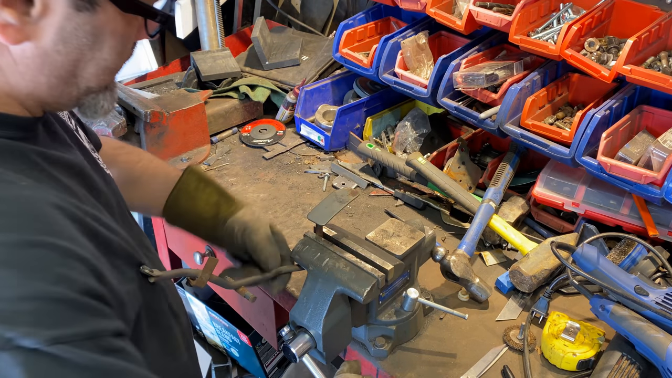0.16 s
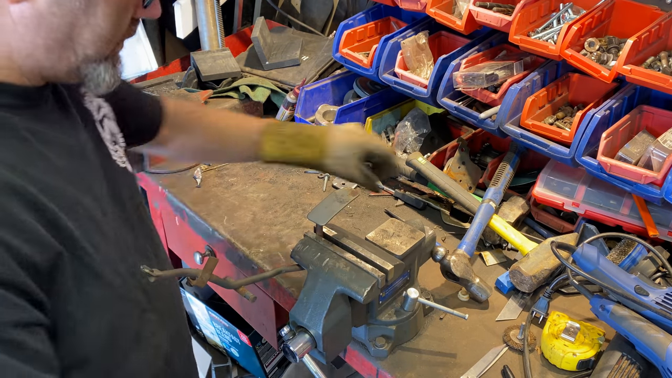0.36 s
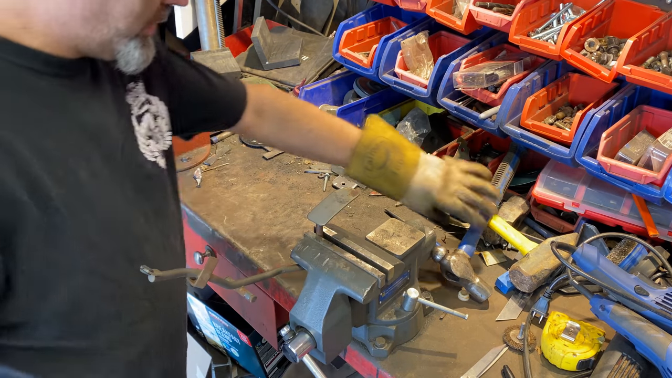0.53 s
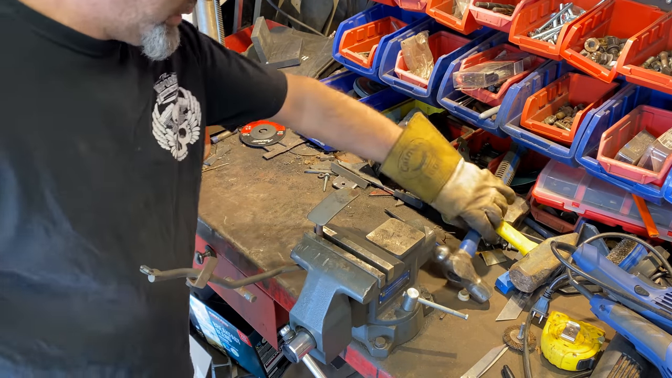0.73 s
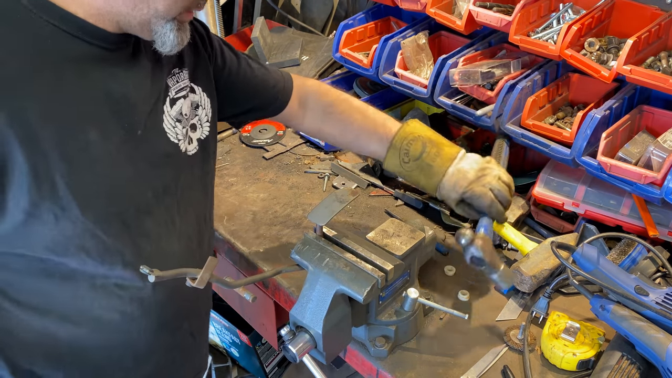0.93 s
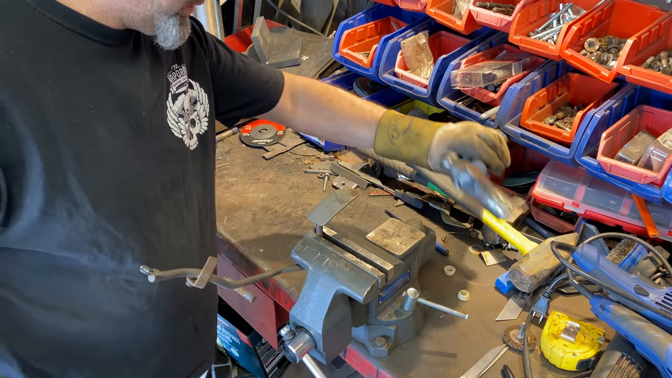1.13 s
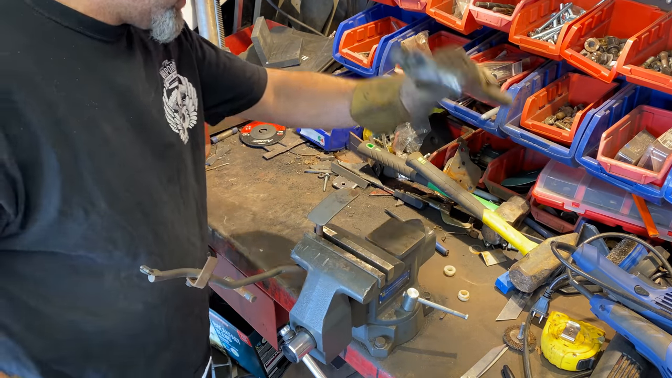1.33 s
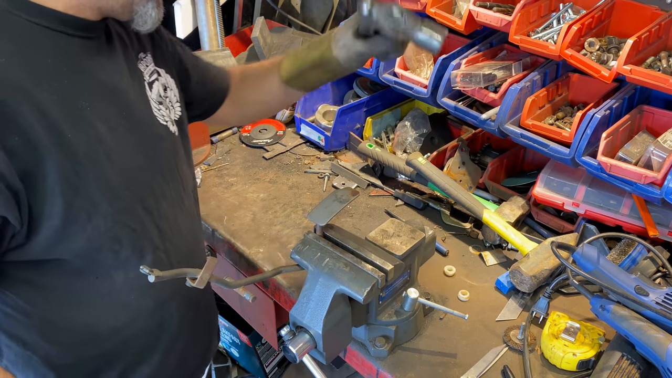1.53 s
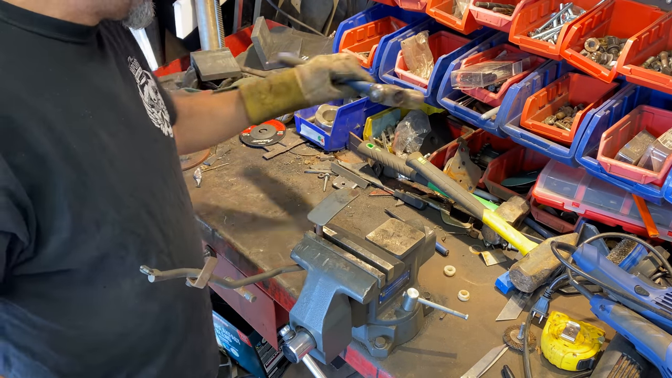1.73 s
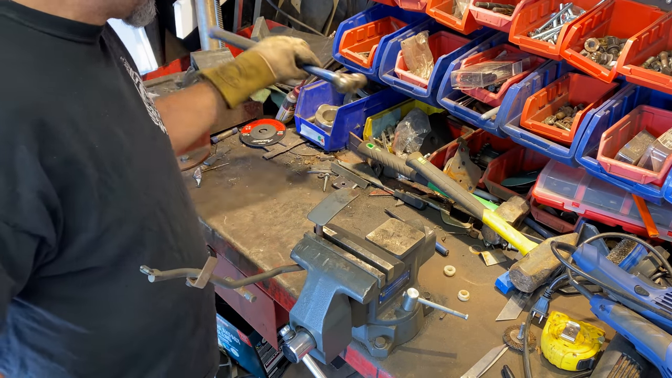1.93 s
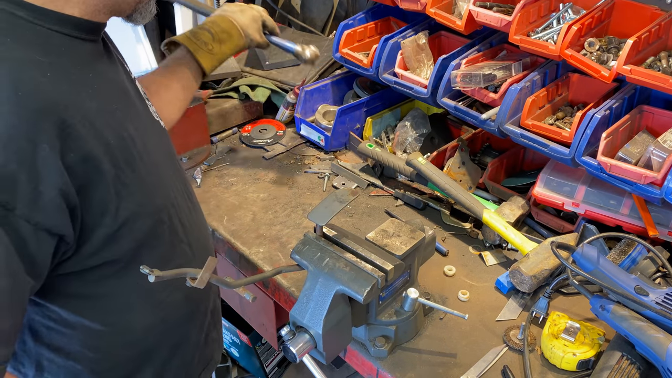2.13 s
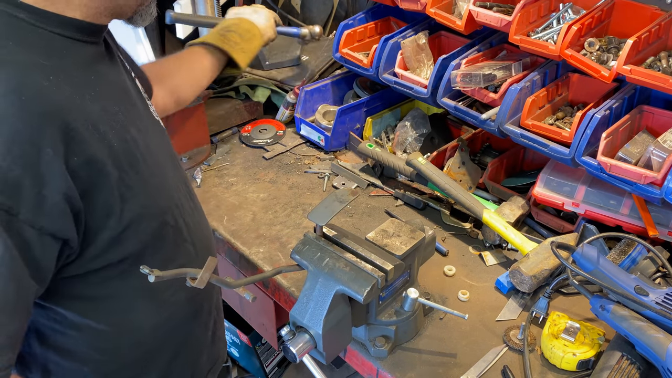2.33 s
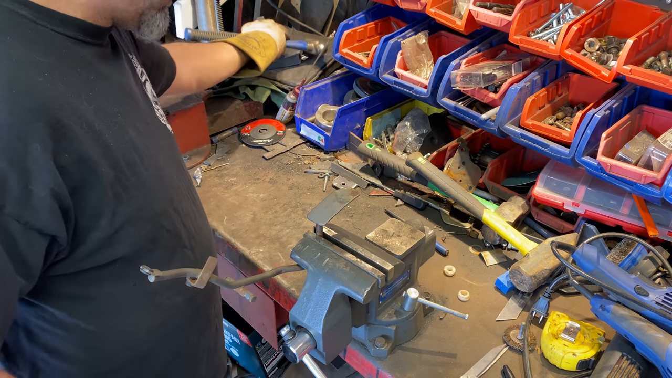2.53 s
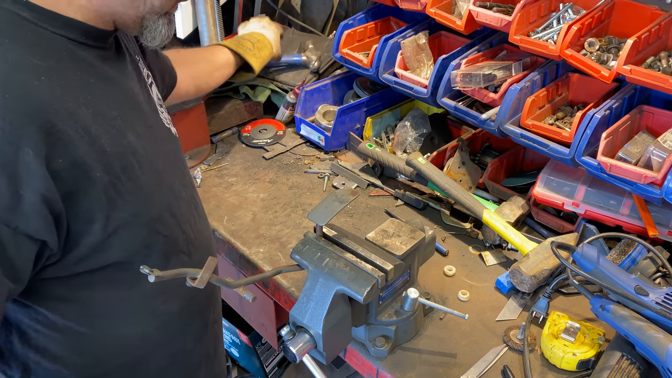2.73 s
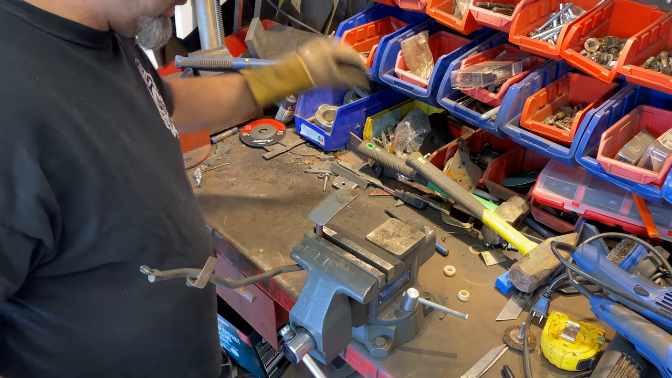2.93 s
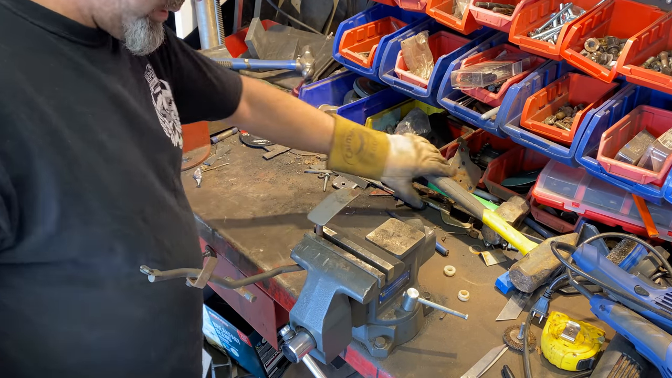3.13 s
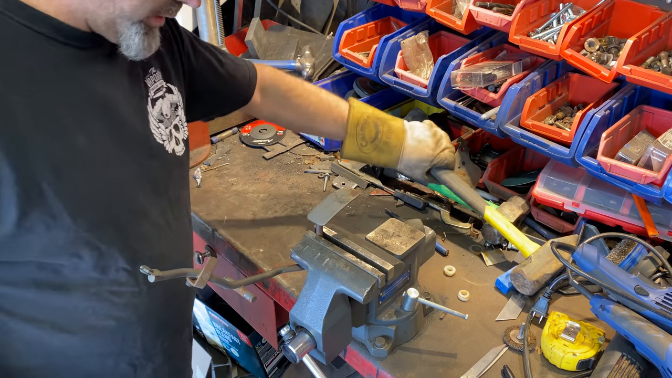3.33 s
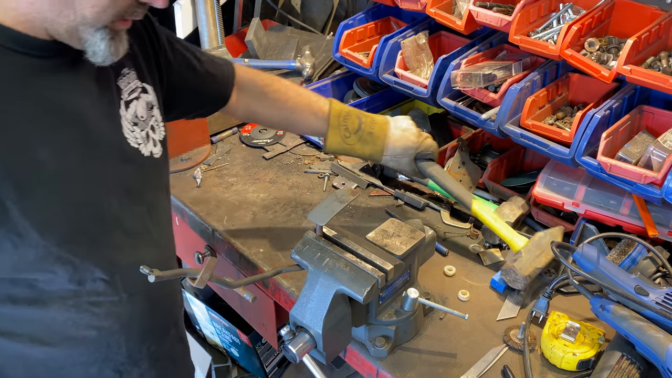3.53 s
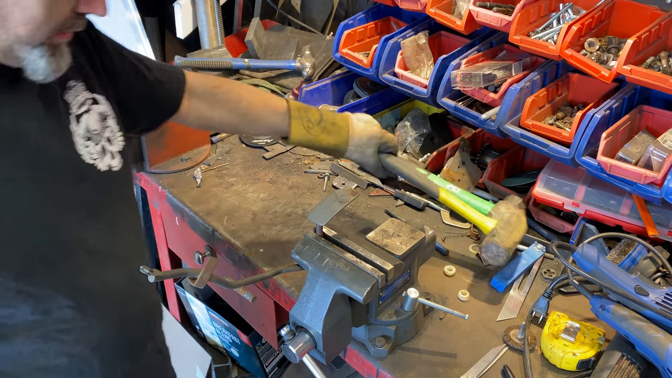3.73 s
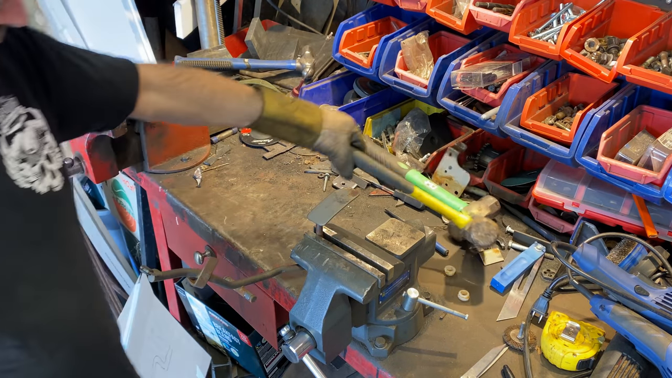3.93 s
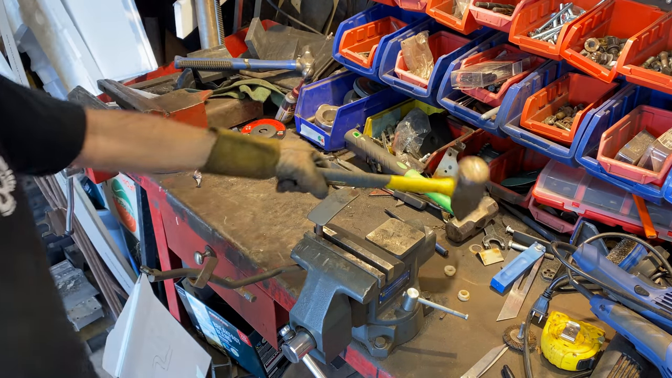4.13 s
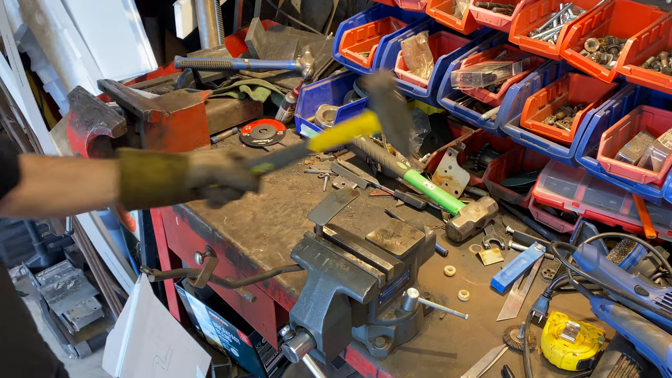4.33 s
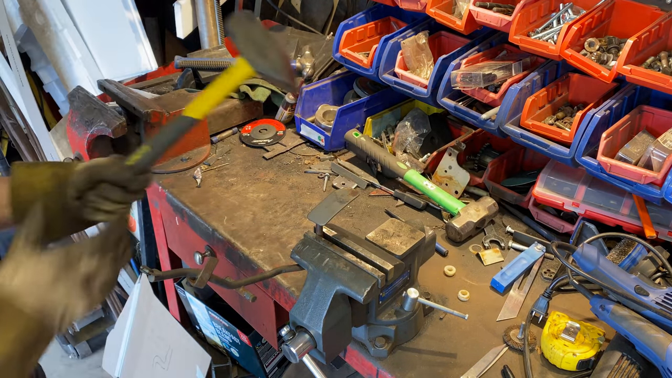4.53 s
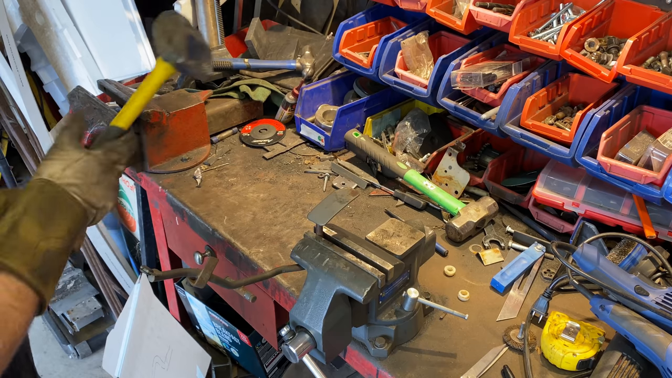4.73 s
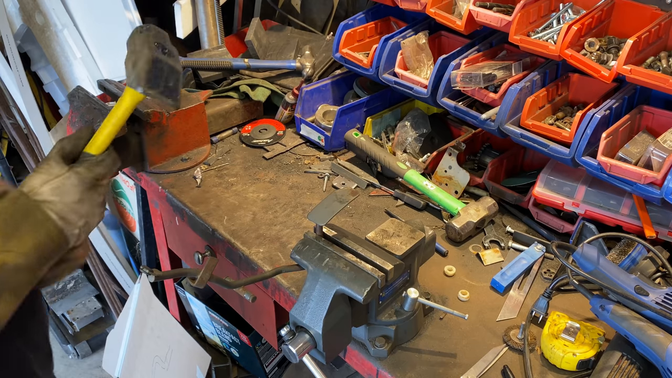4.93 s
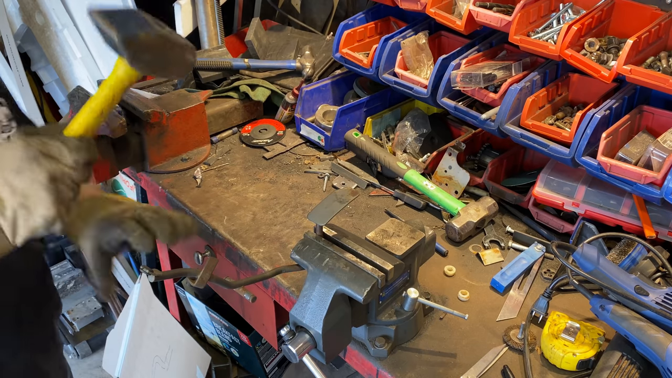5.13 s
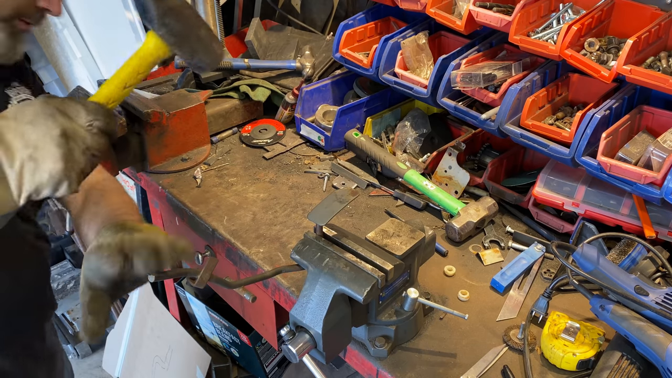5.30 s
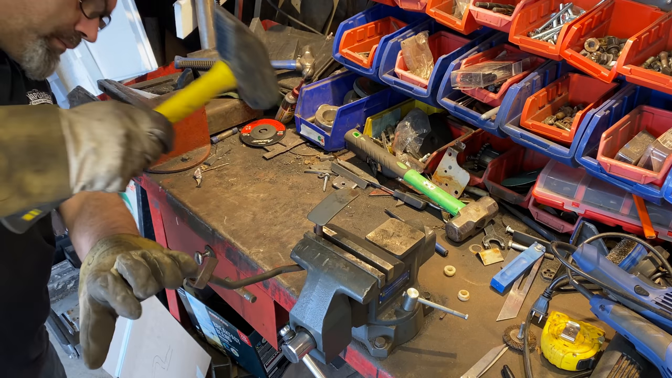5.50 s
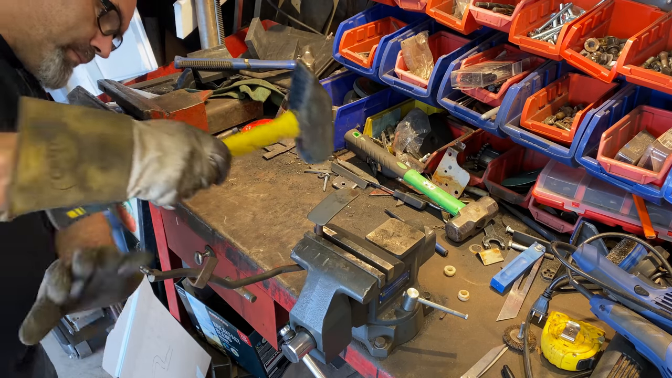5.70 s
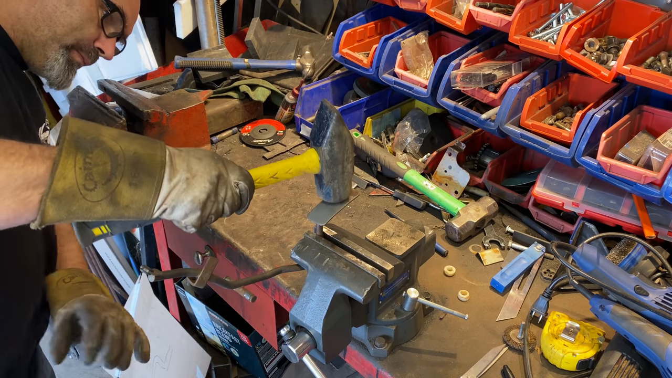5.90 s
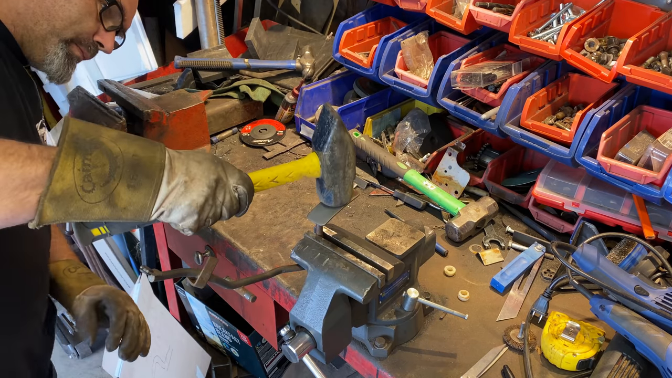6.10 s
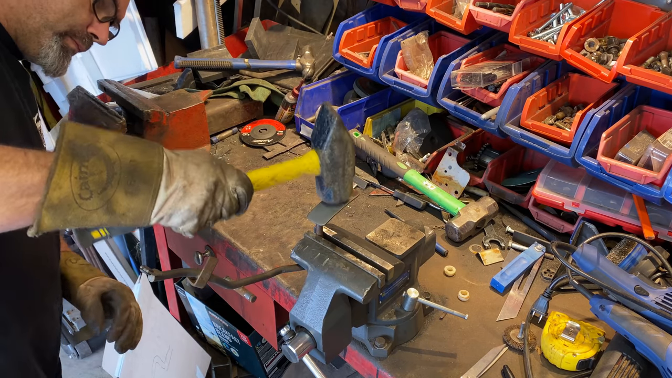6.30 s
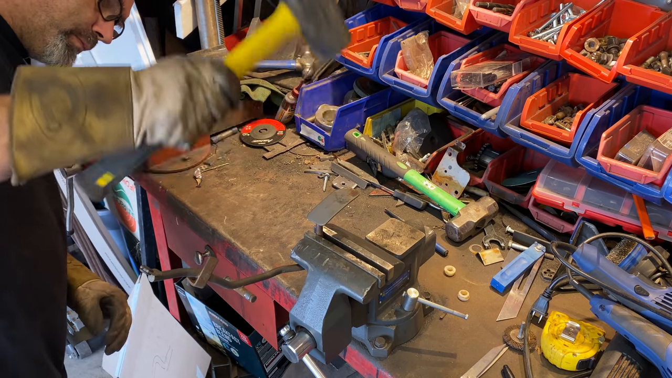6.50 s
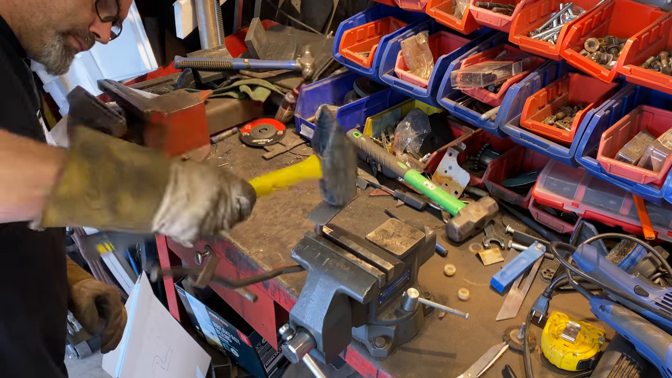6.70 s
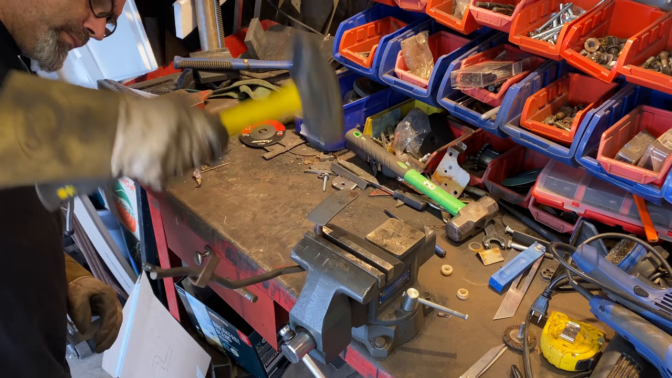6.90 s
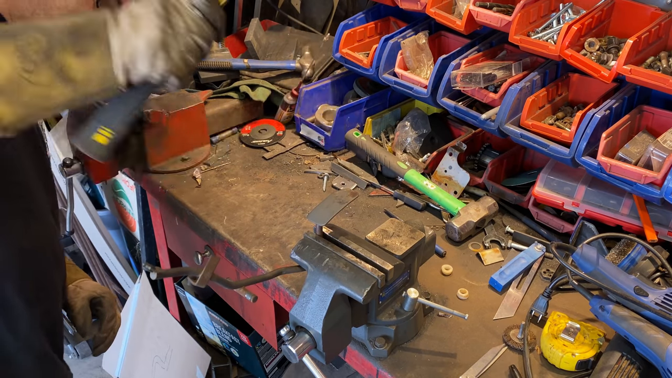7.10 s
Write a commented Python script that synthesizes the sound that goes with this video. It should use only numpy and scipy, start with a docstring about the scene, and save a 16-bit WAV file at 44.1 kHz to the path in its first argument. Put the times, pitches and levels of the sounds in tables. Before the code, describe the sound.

Low airy room tone and a faint motor hum in a small workshop. Up close, wooden and metallic knocks as a hammer is lifted, a pause, then a resonant double clank as it lands among tools. Next a sledge drags and bangs hard, with deep bench thumps and rattling scraps. After soft leather glove rustling, the sledge hits the vise, bright and hard, and again moments later, leaving a brief low ringing and short wall echo.

```python
"""Hard clacks and dull thumps on a cluttered steel bench in a garage: a small hammer is picked up and laid down
among tools, then a sledge is dragged off the bench and taps a vise. Contacts are struck modes plus noisy clatter
and treble cracks; thumps ring the bench; loose hardware rattles in shaped noise and a washer rings on damped sines.
Gloves rustle, a distant motor hums in air noise, the walls answer, and a two-port microphone hears it all."""
import sys
import numpy as np
from scipy import signal
from scipy.fft import rfft, irfft, next_fast_len
from scipy.io import wavfile
from scipy.ndimage import map_coordinates

SR = 44100
rng = np.random.default_rng(int(sys.argv[2]) if len(sys.argv) > 2 else 0)


def wav_out(sig):
    """Save sig, one row per channel (or a flat mono array), as 16-bit PCM at SR to the path in sys.argv[1]."""
    wavfile.write(sys.argv[1], SR, np.round(np.clip(np.atleast_2d(sig).T, -1, 1) * 32767).astype(np.int16))


N = 315315

# left-right likeness of near sounds: (frequency [Hz], likeness [0-1])
NEAR_LIKENESS = [(60, 1), (150, 0.93), (300, 0.57), (700, 0.61), (3000, 0.31), (6500, 0.43), (9000, 0.98)]
# treble fizz spectrum: (frequency [Hz], relative level per Hz [dB])
FIZZ_SPECTRUM = [(4000, -10), (6500, 2.5), (9500, 4), (11500, -2.5), (14500, -6), (16500, -27)]
# shakes by a sliding or landing tool: (loudest time [s], build-up [s], hold [s], drone t60 [s],
# rattle level [dB], treble over rattle [dB], drone level [dB])
BENCH_SHAKES = [(0.234, 0.32, 0.048, 1.2, -56, -6, -67), (0.72, .1, 0.022, 1.1, -49.5, -7, -58),
                (0.953, 0.059, 0.15, 0.35, -38, -6.5, -45), (1.248, 0.27, 0.044, 0.37, -47.5, -12, -35.5),
                (1.452, 0.047, 0.048, 0.48, -58.5, -4, -80), (2.824, 0.074, 0.059, 0.46, -40, -24, -22),
                (2.939, 0.044, 0.013, 0.37, -50, -1, -22), (3.167, .03, 0.42, 0.59, -54.5, -4.5, -48.5),
                (3.477, 0.038, 0.029, 0.24, -39.5, -7, -34.5), (3.558, 0.13, 0.11, 0.26, -34.5, -10, -35.5),
                (3.781, 0.017, 0.039, .3, -35, -12.5, -50.5), (3.862, 0.012, 0.042, 0.4, -20.5, -8, -25),
                (4.016, 0.033, 0.037, 0.46, -26, -17, -23), (4.189, 0.036, 0.11, 1.4, -59.5, -11.5, -48.5),
                (4.51, 0.28, 0.025, 0.86, -52.5, -6.5, -51.5), (4.859, 0.13, 0.029, 2.5, -56.5, -3, -49),
                (5.591, 0.14, 0.13, 1.1, -60.5, 0.5, -72), (5.86, 0.17, 0.028, .15, -64, 2, -70),
                (6.145, 0.27, 0.014, 0.74, -45, -6, -44.5), (6.759, 0.016, 0.062, 0.35, -24, -7.5, -19.5),
                (6.934, 0.067, 0.079, 1.5, -45.5, -10.5, -32)]
# small steel parts that clink: (frequency [Hz], width [Hz], level [dB])
TICK_MODES = [(4700, 70, -8), (5020, 60, -6), (5400, 110, -14), (6620, 120, -12)]


def amp(db):
    """Decibels to gain."""
    return 10 ** (np.asarray(db) / 20)


def unit(x):
    """Scale to rms 1."""
    return x / np.sqrt(np.mean(x ** 2) + 1e-20)


def along(points, hz):
    """Interpolate (Hz, value) points on a log frequency axis."""
    point_hz, value = np.transpose(points)
    return np.interp(np.log(hz + 1), np.log(point_hz + 1), value)


def wobble(knots_per_s):
    """Smooth random curve through evenly spaced normal knots."""
    knots = rng.standard_normal(int(N * knots_per_s / SR) + 4)
    return map_coordinates(knots, [np.arange(N) * knots_per_s / SR])


def filtered(x, response):
    """Multiply the spectrum of x by a complex response of frequency."""
    m = next_fast_len(N + SR // 2)
    return irfft(rfft(x, m) * response(np.fft.rfftfreq(m, 1 / SR)), m)[..., :N]


def causal(points):
    """Minimum-phase impulse response of a spectrum, by folding its cepstrum; energy 1."""
    magnitude = amp(along(points, np.fft.rfftfreq(4096, 1 / SR)))
    cepstrum = irfft(np.log(magnitude + 1e-6))
    cepstrum[1:2048] *= 2
    cepstrum[2049:] = 0
    impulse = irfft(np.exp(rfft(cepstrum)))[:2048]
    return impulse / np.linalg.norm(impulse)


def mid_side_angle(likeness, hz):
    """Angle whose cosine and sine weight mid and side for a given left-right likeness."""
    return np.arccos(np.clip(along(likeness, hz), -1, 1)) / 2


def stereo(pair, likeness):
    """Turn two unrelated signals into left and right with a set likeness at each frequency."""
    def weights(hz):
        angle = mid_side_angle(likeness, hz)
        return np.array([np.cos(angle), np.sin(angle)])
    mid, side = filtered(pair, weights)
    return np.array([mid + side, mid - side])


def rings(modes):
    """Causal frequency response of a sum of resonances."""
    return lambda f: sum(amp(db) * 1j * f * w / (c * c - f * f + 1j * f * w) for c, w, db in modes)


def ringing(modes, t, rise_s):
    """Damped sines; mid phases spread over just under half a turn, side phases over a full turn."""
    hz, width_hz, db = np.transpose(modes)[:, :, None]
    phase = rng.uniform(0, 2 * np.pi, (1, len(hz), 1)) * [[[.45]], [[1]]]
    strength = amp(db + rng.normal(0, 2, (2, len(hz), 1)))
    sines = strength * np.sin(2 * np.pi * hz * t + phase) * np.exp(-np.pi * width_hz * t)
    return (1 - np.exp(-(t / rise_s) ** 2)) * sines.sum(axis=1)


def garage():
    """Steady air noise, a wavering motor tone that sags in pitch, and fainter wavering tones."""
    # air noise: (frequency [Hz], relative level per Hz [dB])
    air_spectrum = [(15, -35.5), (35, 7), (60, 19), (120, -1.5), (250, -3.5), (500, -13), (800, -15.5),
                    (1100, -22.5), (2000, -30), (5000, -41.5), (11000, -41), (15500, -44.5), (16200, -60)]
    # left-right likeness of far sound: (frequency [Hz], likeness [0-1])
    far_likeness = [(60, 0.96), (150, 0.39), (300, 0.23), (700, 0.03), (3000, 0.14), (9000, 0.93)]
    # further tones: (frequency [Hz], level [dB])
    faint_tones = [(232, -70), (371, -72), (538, -73), ]
    air_db, hum_db = -49.5, -69
    hum_start_hz, hum_sag_hz_per_s = 694, 7

    noise = rng.standard_normal((2, N)) * amp(0.4 * wobble(7.9))
    air = filtered(noise, lambda hz: amp(along(air_spectrum, hz)))
    hum_hz = hum_start_hz - hum_sag_hz_per_s * np.arange(N) / SR
    port_phase = np.array([[0], [1.2]])  # radians, left and right
    tones = np.zeros((2, N))
    for hz, db in [(hum_hz, hum_db), *faint_tones]:
        level = amp(db + 4 * wobble(7))
        phase = 2 * np.pi * np.cumsum(hz + 4 * wobble(6)) / SR
        tones += level * np.sin(phase + port_phase)
    return amp(air_db) * unit(stereo(air, far_likeness)) + tones


def walls(x):
    """Noise tails, each frequency dying at its own speed; redrawn every 0.1 s so no single pattern repeats."""
    # decay of the echo: (frequency [Hz], t60 [s])
    wall_decay = [(100, 0.57), (1000, 0.24), (4000, 0.2), (12000, 0.042)]
    out = np.zeros((2, N + SR))
    step, delay = SR // 10, 250  # samples
    for start in range(0, N, step):
        hz, t, z = signal.stft(rng.standard_normal((2, SR // 2)), SR, nperseg=256)
        envelope = np.tanh(t / 0.0022) * amp(-60 * t / along(wall_decay, hz)[:, None])
        tail = signal.istft(z * envelope, SR, nperseg=256)[1]
        block = x.mean(0)[None, start:start + step]
        echo = signal.fftconvolve(block, tail / np.linalg.norm(tail[0]), axes=1)
        out[:, start + delay:][:, :echo.shape[1]] += echo
    return stereo(out[:, :N], NEAR_LIKENESS)


def shaking(levels_db, rest_db, t60_factor):
    """Envelope of shakes that build up, hold and die away; powers add over the level at rest."""
    build_range_db = 20
    t = np.arange(N) / SR
    power = np.full(N, amp(2 * rest_db))
    for (s, build_s, hold_s, t60_s, *_), db in zip(BENCH_SHAKES, levels_db):
        rise_db = build_range_db * (s - t) / max(build_s, .005)
        fall_db = 60 * (t - s - hold_s) / max(t60_s * t60_factor, .02)
        below_db = np.maximum(rise_db, fall_db)
        power += amp(2 * (db - np.maximum(below_db, 0)))
    return np.sqrt(power)


def chinks(count):
    """Small scraps, each a resonator of its own pitch, knocked at chance moments."""
    knocks_per_s = 220  # on each scrap and channel
    out = np.zeros((2, N))
    for hz in 450 * 9 ** rng.uniform(size=count):
        knocks = (rng.uniform(size=(2, N)) < knocks_per_s / SR) * rng.standard_normal((2, N))
        fade = np.exp(-np.pi * (25 + hz / 45) / SR)
        poles = [1, -2 * fade * np.cos(2 * np.pi * hz / SR), fade ** 2]
        scrap = unit(signal.lfilter([1, 0, -1], poles, knocks))
        out += scrap / np.sqrt(count) * (hz / 2000) ** .5
    return out


def rattle():
    """Loose hardware chatters and fizzes in uneven grains; panels drone under it as shaped noise."""
    # screws and scraps: (frequency [Hz], relative level per Hz [dB])
    scrap_spectrum = [(300, -24.5), (600, -1), (1200, 2.5), (2500, -3), (5000, -1.5), (7000, -17.5),
                      (9000, -60)]
    # drone of the bench panels: (frequency [Hz], relative level per Hz [dB])
    panel_spectrum = [(18, -44), (30, -14.5), (140, 4.5), (183, -4), (304, -7), (401, -5.5), (447, -8),
                      (581, -5.5), (1200, -25), (1560, -57), (2640, -120)]
    chink_db = -8

    rattle_db, treble_db, drone_db = np.transpose(BENCH_SHAKES)[4:]
    grains = amp(1.5 * wobble(60) + 0.58 * wobble(400))
    hiss = grains * rng.standard_normal((2, 2, N))
    scraps = .5 * hiss[0] + amp(chink_db) * chinks(count=20)
    chatter = unit(filtered(scraps, lambda hz: amp(along(scrap_spectrum, hz))))
    fizz = unit(filtered(hiss[1], lambda hz: amp(along(FIZZ_SPECTRUM, hz))))
    rumble = rng.standard_normal((2, N)) * amp(2.5 * wobble(25))
    drone = unit(filtered(rumble, lambda hz: amp(along(panel_spectrum, hz))))
    mix = shaking(rattle_db, rest_db=-76, t60_factor=0.82) * chatter
    mix += shaking(rattle_db + treble_db, rest_db=-81.5, t60_factor=0.77) * fizz
    mix += shaking(drone_db, rest_db=-57.5, t60_factor=1) * drone
    return stereo(mix, NEAR_LIKENESS)


def washer():
    """A flicked washer rings thinly on damped sines; single ringing notes sound around the blows."""
    # loose washer: (frequency [Hz], width [Hz], relative level [dB])
    washer_modes = [(5870, 10, -7), (9880, 9.7, 5), (12300, 13, -8)]
    # single ringing notes, some short knocks, some lingering after the last vise blow:
    # (time [s], frequency [Hz], width [Hz], level [dB])
    single_notes = [(5.03, 780, 14, -52), (5.14, 780, 7, -56), (6.9, 452, 5, -37), (7.02, 310, 6, -40),
                    (4.117, 1150, 60, -13), (4.157, 1160, 60, -16), (6.765, 2640, 20, -27),
                    (6.84, 1110, 8, -36), (6.915, 4000, 14, -42)]
    washer_s, washer_db = 2.94, -36.5
    out, t = np.zeros((2, N + SR)), np.arange(SR // 4) / SR
    out[:, round(washer_s * SR):][:, :len(t)] = amp(washer_db) * ringing(washer_modes, t, rise_s=0.0098)
    for s, *mode in single_notes:
        out[:, round(s * SR):][:, :len(t)] += ringing([mode], t, rise_s=0.004)
    return stereo(out[:, :N], NEAR_LIKENESS)


def bench():
    """Each thump shoves the bench with a short pulse and rings the modes nearest to its centre."""
    # thumps: (time [s], level before a common 9 dB cut [dB], centre [Hz], t60 at 150 Hz [s])
    bench_thumps = [(0.775, -12.5, 318, 0.085), (0.813, -16, 384, 0.22), (0.853, -5, 174, 0.057),
                    (1.073, 1.5, 412, 0.051), (1.099, -5, 66.73, 0.052), (1.239, -19.5, 224, 0.17),
                    (1.327, -23, 84.5, 0.056), (2.636, -2.5, 245, 0.32), (2.68, -15.5, 280, 0.08),
                    (2.74, -6, 283.3, 0.11), (2.805, -2.5, 224, 0.27), (2.872, -24.5, 234, 0.078),
                    (2.946, -25.5, 93.5, 0.17), (3.061, -24.5, 82.3, 0.24), (3.514, -16, 347, 0.12),
                    (3.544, -16.5, 207, 0.17), (3.589, -20.5, 178.6, 0.13), (3.788, -0.5, 150.8, 0.089),
                    (3.801, -5, 286.7, 0.13), (3.89, 11, 207.7, 0.07), (3.91, 1, 155.6, 0.075),
                    (3.958, -20.5, 139.5, 0.091), (4.023, 7, 171, 0.055), (4.157, -23, 200.3, 0.19),
                    (5.428, -35, 124.1, 0.25), (5.972, -13.5, 90.6, 0.18), (5.995, 1, 131.8, 0.098),
                    (6.05, -7.5, 131.8, 0.24), (6.073, -5, 166, 0.039), (6.087, 0.5, 136, 0.081),
                    (6.751, 8.5, 78.4, 0.034), (6.779, 1, 135, 0.052), (6.804, -12.5, 179.2, 0.14),
                    (6.967, -21, 120, 0.45), (7.079, -22.5, 128, 0.27)]
    # bench modes: (frequency [Hz], level [dB])
    bench_modes = [(62, -1.5), (78, 10.5), (90, 8), (120, -6), (137, 1), (154, 6.5), (190, 0.5), (219, 3.5),
                   (276, 6.5), (300, -0.5), (346, 5), (400, 2)]
    push_db = 6

    out, t = np.zeros((2, N + SR)), np.arange(SR // 2) / SR
    hz, level_db = np.transpose(bench_modes)[:, :, None]
    for s, db, centre_hz, t60_s in bench_thumps:
        near_db = -20 * np.abs(np.log2(hz / centre_hz))
        strength = amp(level_db + near_db + rng.normal(0, 1.5, (2, len(hz), 1)))
        phase = rng.uniform(0, 2 * np.pi, (1, len(hz), 1)) * [[[.06]], [[1]]]
        mode_t60_s = max(t60_s, .02) * (150 / hz) ** 0.4
        modes = strength * np.sin(2 * np.pi * hz * t + phase) * amp(-60 * t / mode_t60_s)
        ring = (1 - np.exp(-t * centre_hz / .7)) * modes.sum(axis=1)
        u = 6 * t * centre_hz
        push = amp(push_db) * u * (u - 2) * np.exp(-u) * [[1], [0]]  # mid only
        out[:, round(s * SR):][:, :len(t)] += amp(db - 9) * (ring + push)
    return stereo(out[:, :N], NEAR_LIKENESS)


def contacts(table, modes, bright, ring_db, grit_db, bright_db, hiss_db, clatter_db, sharp_s, slope_db,
             pan_db, soften=0):
    """A blow rings the modes near its centre and cracks in the treble; a noisy clatter follows."""
    # broad clack: (frequency [Hz], relative level per Hz [dB])
    grit_spectrum = [(300, -15), (800, 7), (2500, 1.5), (5000, -8), (9000, -24.5), (16000, -47.5)]
    widen_at_full, dull_db_per_db = 1.2, 1.5
    sing_db = 19  # how strongly the hiss rings the bright modes
    clean_db = 2  # more ring per halving of the clatter t60
    side_spread = 0.6

    out, t = np.zeros((2, N + SR)), np.arange(SR // 2) / SR
    hz = np.fft.rfftfreq(SR, 1 / SR)
    grit = amp(grit_db) * rfft(causal(grit_spectrum), SR)
    edge = rfft(causal(FIZZ_SPECTRUM), SR)
    angle = mid_side_angle(NEAR_LIKENESS, hz)
    pan = amp(np.array([[pan_db], [-pan_db]]) / 2)

    def dying(life_s, rise_s):
        envelope = (1 - np.exp(-(t / rise_s) ** 2)) * amp(-60 * t / max(life_s, .004))
        return envelope * rng.standard_normal((2, len(t)))

    for s, db, treble_db, centre_hz, t60_s in table:
        rise_s = sharp_s * amp(-soften * treble_db)  # with soften, dull contacts swell more slowly
        # each contact's modes are detuned slightly at random; loud blows are damped more
        detune = 1 + .006 * rng.standard_normal() + .006 * rng.standard_normal(len(modes))
        widen = 1 + widen_at_full * amp(db)
        struck = [(c * k, w * widen, level - slope_db * abs(np.log2(c / centre_hz)))
                  for (c, w, level), k in zip(modes, detune)]
        lifted = [(c, w, level + 1.5) for c, w, level in struck]
        # only the hardest contacts reach the top modes
        dull_db = dull_db_per_db * min(treble_db - 5, 0)
        shine = [(c, w, level + dull_db * (c > 9000)) for c, w, level in bright]

        body_db = ring_db + clean_db * np.log2(0.13 / max(t60_s, .02))
        blow = amp(body_db) * ringing(struck, t, rise_s)
        blow += amp(treble_db + bright_db) * ringing(shine, t, rise_s / 2)

        # uneven knocks, 150 samples each
        knocks = amp(2.2 * np.repeat(rng.standard_normal(len(t) // 150), 150))
        scrape = rings([(centre_hz, .8 * centre_hz, -12)])(hz)  # rubbing, loudest near the centre
        clatter = amp(clatter_db) * rfft(knocks * dying(t60_s, rise_s), SR)
        clatter = clatter * (amp(8.5) * rings(lifted)(hz) + grit + scrape)

        hiss = amp(-7.0) * dying(rise_s + 0.012, rise_s) + amp(hiss_db) * dying(0.32 * t60_s, rise_s)
        crack = amp(treble_db) * rfft(hiss, SR) * (edge + amp(sing_db) * rings(bright)(hz))

        total = rfft(blow * [[1], [side_spread]], SR) + clatter + crack
        mid, side = irfft(total * [np.cos(angle), np.sin(angle)], SR)[:, :len(t)]
        out[:, round((s - rise_s) * SR):][:, :len(t)] += amp(db) * pan * [mid + side, mid - side]
    return out[:, :N]


def gloves():
    """Gloves rustle: slow-rising noise through broad, weakly ringing bands."""
    # grips: (time [s], level [dB], treble over level [dB], ring centre [Hz], clatter t60 [s])
    grips = [(0.133, -59.5, 10, 600, 0.41), (0.362, -49, -47, 680, 0.62), (2.269, -57, -21, 685, 0.2),
             (4.419, -51, -3, 695, 0.48), (4.733, -48.5, 3.5, 1240, 1), (4.822, -33, -23.5, 975, 0.41),
             (5.04, -37.5, -1, 790, 0.11), (5.563, -49.5, 2.5, 764, 0.35), (5.616, -51, 2, 2100, 0.91),
             (5.692, -56, 22.5, 684, 0.22)]
    # glove: (frequency [Hz], width before widening [Hz], level [dB])
    glove_modes = [(520, 300, -3), (900, 450, 0), (2400, 1400, -4)]
    return contacts(grips, glove_modes, TICK_MODES, ring_db=-28.5, grit_db=-10.0, bright_db=-30.5, hiss_db=-0.5,
                    clatter_db=-1.5, sharp_s=0.014, slope_db=0.0, pan_db=4.0)


def hammer_picked_up():
    """Short contacts ring the hammer handle as it is picked up."""
    # contacts: (time [s], level [dB], treble over level [dB], ring centre [Hz], clatter t60 [s])
    picked = [(0.679, -28.5, -17.5, 1210, 0.16), (0.77, -9.5, -52.5, 928, 0.02),
              (0.835, -24.5, -16.5, 1320, 0.039), (0.848, -12.5, -10, 862, 0.039),
              (1.065, -9, -43.5, 918, 0.076), (1.073, -10.5, -41.5, 683, 0.05),
              (1.095, -17.5, -28, 878, 0.085), (1.133, -21.5, -27.5, 1040, 0.061),
              (1.232, -7.5, -31, 958, 0.02), (1.295, -20.5, -36, 987, 0.073),
              (1.319, -24, -45.5, 888, 0.057)]
    # handle: (frequency [Hz], width before widening [Hz], level [dB])
    handle_modes = [(370, 60, -4), (500, 60, -10), (865, 85, 0), (1010, 80, -6), (1330, 70, -4),
                    (1700, 90, -7), (2050, 100, -9), (2320, 110, -8), (3100, 200, -16)]
    return contacts(picked, handle_modes, TICK_MODES, ring_db=5.5, grit_db=-7.5, bright_db=-26.5, hiss_db=5.0,
                    clatter_db=-5.5, sharp_s=.004, slope_db=3.5, pan_db=1.4)


def hammer_laid_down():
    """The hammer lands among tools and rings the tray modes strongly."""
    # contacts: (time [s], level [dB], treble over level [dB], ring centre [Hz], clatter t60 [s])
    laid = [(2.634, -12, -26, 621.6, 0.51), (2.678, -14, -35, 527, 0.14), (2.699, -19, -29.5, 950, 0.13),
            (2.732, -18.5, -15.5, 510, 0.12), (2.774, -23, -23, 536, 0.072),
            (2.804, -5.5, -42.5, 743, 0.19), (2.874, -16.5, -19, 660, 0.35), (2.904, -21, -27, 1233, 0.4),
            (2.92, -25.5, -19, 1682, 0.18), (2.935, -19.5, -19, 1470, 0.23)]
    # tray: (frequency [Hz], width before widening [Hz], level [dB])
    tray_modes = [(330, 4, -14), (540, 60, -2), (754, 30, 1), (900, 70, -5), (1080, 55, -6), (1300, 70, -4),
                  (1600, 90, -2), (2000, 120, -6), (2680, 250, -12)]
    return contacts(laid, tray_modes, TICK_MODES, ring_db=12.5, grit_db=-12.0, bright_db=-4.0, hiss_db=-5.0,
                    clatter_db=-4.5, sharp_s=0.0025, slope_db=10.5, pan_db=2.5)


def sledge_dragged():
    """The dragged sledge knocks and clatters on dense modes."""
    # contacts: (time [s], level [dB], treble over level [dB], ring centre [Hz], clatter t60 [s])
    dragged = [(3.156, -41.5, -12.5, 1900, 0.32), (3.185, -42.5, -6.5, 1940, 0.3),
               (3.3, -38, -1, 1540, 0.13), (3.328, -42, 1, 1120, 0.18), (3.402, -42.5, 3.5, 2800, 0.092),
               (3.476, -29.5, -29.5, 997, 0.039), (3.514, -22, -19.5, 1045, 0.34),
               (3.537, -16, -7.5, 923, 0.2), (3.546, -16.5, -14, 1012, 0.14),
               (3.563, -17, -16.5, 1010, 0.09), (3.635, -22.5, 1, 1080, 0.2),
               (3.782, -1.5, -43, 1207, 0.08), (3.828, -8.5, -22.5, 746, 0.25),
               (3.857, -2, -14, 3910, 0.12), (3.889, -10.5, -14, 1050, 0.2), (3.937, -13.5, -7, 3284, 0.23),
               (4.005, -5.5, -12.5, 1960, 0.13), (4.021, -1.5, -43.5, 555, 0.062),
               (4.161, -27.5, -45, 1753, 0.07), (4.853, -23, -17.5, 905, 0.24)]
    # sledge: (frequency [Hz], width before widening [Hz], level [dB])
    sledge_modes = [(350, 50, 2), (525, 55, 0), (775, 50, -3), (1012, 45, 1), (1190, 9, -27),
                    (1300, 90, -5), (1610, 90, -5), (1830, 80, 0), (2040, 60, -3), (2230, 36, -2),
                    (2950, 90, -7), (3300, 120, -6), (3660, 45, -4), (3960, 60, -3), (4540, 120, -8)]
    return contacts(dragged, sledge_modes, TICK_MODES, ring_db=0.0, grit_db=-10.0, bright_db=-1.5, hiss_db=-3.5,
                    clatter_db=-5.0, sharp_s=0.0016, slope_db=11, pan_db=1.0)


def vise_tapped():
    """The sledge taps the vise: sharp blows ring its body and bright face modes."""
    # contacts: (time [s], level [dB], treble over level [dB], ring centre [Hz], clatter t60 [s])
    taps = [(5.9652, -22, 7, 1377, 0.19), (5.98, -11.5, -44.5, 555, 0.25), (6.055, -21.5, -14, 1343, 0.21),
            (6.069, -17, -37, 1263, 0.11), (6.088, -19, 1.5, 1570, 0.21), (6.096, -18, -15.5, 1284, 0.11),
            (6.739, -24, -20.5, 907, 0.3), (6.749, -21, 3.5, 701, 0.74), (6.773, -15.5, -32.5, 493.5, 0.37),
            (6.809, -21, -20.5, 443.6, 0.18), (6.849, -31, -28, 700, 0.3), (6.993, -48.5, 2.5, 1600, 0.25),
            (7.048, -38, -30.5, 900, 0.12), (7.122, -41, -35, 800, 0.12)]
    # vise body: (frequency [Hz], width before widening [Hz], level [dB])
    vise_modes = [(305, 9, -13), (450, 7, -13), (545, 40, -2), (720, 30, -6), (870, 8, -17), (1020, 45, -6),
                  (1285, 40, 4), (1580, 55, 0), (1720, 35, 2), (1840, 55, -2), (2270, 70, -8),
                  (2700, 60, -10), (3190, 60, -4), (3980, 40, -12)]
    # bright face: (frequency [Hz], width [Hz], level [dB])
    face_modes = [(3190, 70, -20), (5150, 80, -16), (6350, 280, 0), (7250, 280, -8), (11100, 350, -13),
                  (14600, 300, -16)]
    return contacts(taps, vise_modes, face_modes, ring_db=1.5, grit_db=-5.0, bright_db=13.5, hiss_db=-11.5,
                    clatter_db=-5.5, sharp_s=0.00068, slope_db=5.5, pan_db=1.5, soften=.35)


def scene():
    """Tools on the bench, their echo, the rattle and the room."""
    tools = hammer_picked_up() + hammer_laid_down() + sledge_dragged() + vise_tapped() + gloves()
    thumps = bench()
    echo = walls(amp(-12.5) * tools + amp(-11) * thumps)
    return tools + thumps + echo + washer() + rattle() + garage()


def record(dry):
    """Ports differ in phase by frequency; peaks round off, deep bass is lost, the band ends steeply."""
    # phase between the ports: (frequency [Hz], left lead [rad])
    port_lead = [(300, 0), (700, -.4), (2500, .4), (7000, 0), (8800, -2.9), (9600, -3.8), (11000, -6.3),
                 (12800, -9.1), (13800, -9.7), (14800, -12.4), (16500, -12.8)]
    bass_cut_hz, top_hz = 45, 16000

    def bass_cut(hz):
        return 1j * hz / (bass_cut_hz + 1j * hz)

    def port_response(hz):
        return bass_cut(hz) * np.exp(.5j * along(port_lead, hz) * np.array([[1], [-1]]))

    ports = filtered(dry, port_response)
    rounded = ports / (1 + np.abs(ports / 1.05) ** 6) ** (1 / 6)
    return filtered(rounded, lambda hz: bass_cut(hz) * (hz < top_hz))


dry = scene()
out = record(dry)
wav_out(out)
```